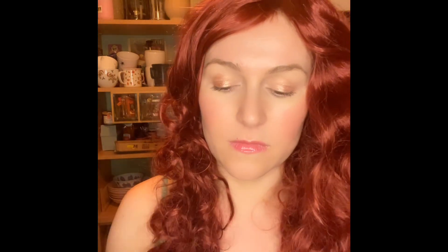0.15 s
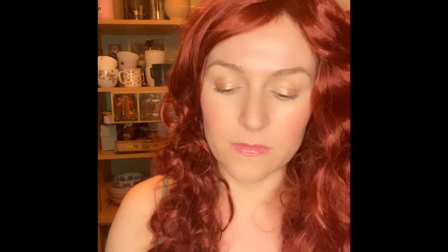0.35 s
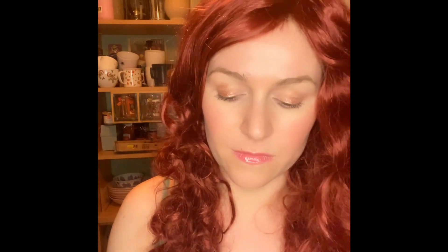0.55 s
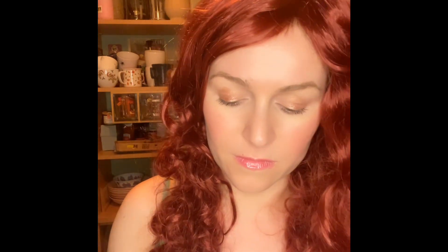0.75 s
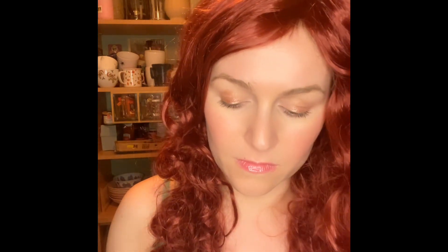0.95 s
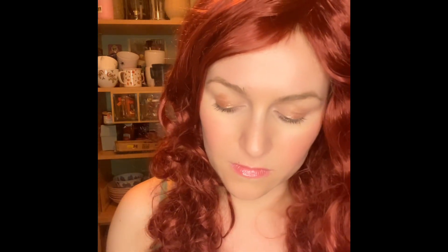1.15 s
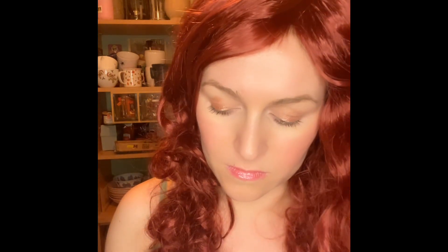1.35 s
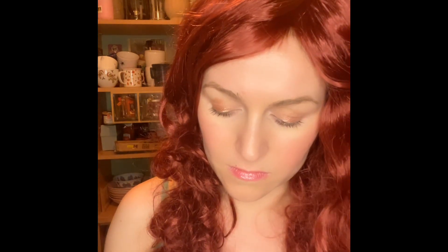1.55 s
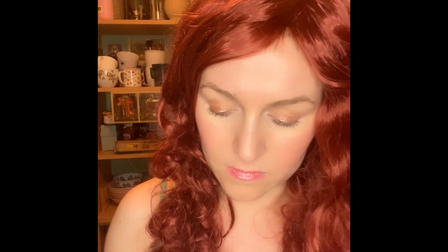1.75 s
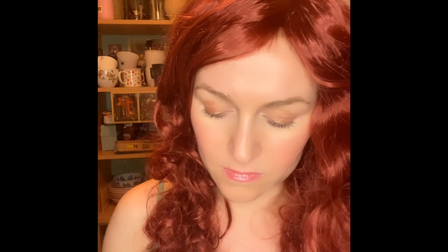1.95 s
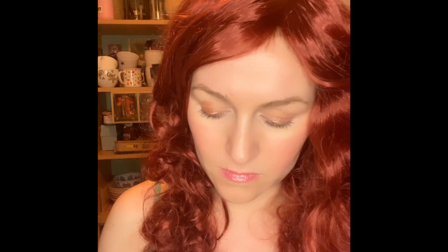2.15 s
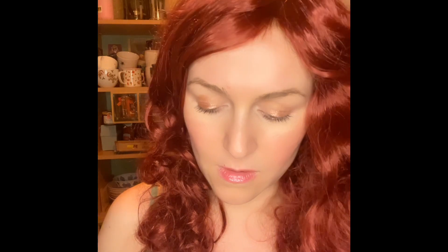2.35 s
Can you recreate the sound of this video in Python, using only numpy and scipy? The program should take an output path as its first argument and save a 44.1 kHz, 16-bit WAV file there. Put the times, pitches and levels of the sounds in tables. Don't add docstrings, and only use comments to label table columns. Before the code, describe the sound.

A zipper on a small cloth bag rasps open in uneven tugs, teeth snapping and ticking, the fabric wall popping softly; close microphone, quiet indoor room with faint reverberation.

```python
import sys
import numpy as np
from scipy import signal
from scipy.fft import rfft, irfft, next_fast_len
from scipy.io import wavfile
from scipy.ndimage import uniform_filter1d, map_coordinates

SR = 44100
rng = np.random.default_rng(int(sys.argv[2]) if len(sys.argv) > 2 else 0)


def invert_db(level):
    return 10 ** (np.asarray(level, dtype=float) / 20)


def persist_wave(psi):
    counts = np.round(np.clip(psi, -1, 1) * 32767).astype(np.int16)
    wavfile.write(sys.argv[1], SR, np.atleast_2d(counts).T)


N = 105840

# frequency in Hz, density in dB per Hz.
TAPE_SPECTRUM = [(120, -7), (200, -7), (426, 3), (522, -7.5), (844, -7.5), (5550, -12), (12500, -25),
                 (15300, -40), (16500, -64)]


def unit(x):
    return x / np.sqrt(np.mean(x ** 2) + 1e-20)


def along(points, hz):
    f, v = np.transpose(points)
    return np.interp(np.log(hz + 1), np.log(f + 1), v)


def wobble(rate):
    knots = rng.standard_normal(1000)
    return map_coordinates(knots, [np.minimum(np.arange(N) * rate / SR, 990)])


def filtered(x, response):
    m = next_fast_len(N + SR // 2)
    return irfft(rfft(x, m) * response(np.fft.rfftfreq(m, 1 / SR)), m)[:N]


def rush(spectrum, patchy_db):
    z = signal.stft(rng.standard_normal(N), nperseg=256)[2]
    field = uniform_filter1d(rng.standard_normal(z.shape), size=6, axis=0)
    field = uniform_filter1d(field, size=4, axis=1)
    x = signal.istft(z * invert_db(patchy_db * unit(field)), nperseg=256)[1][:N]
    return unit(filtered(x, lambda hz: invert_db(along(spectrum, hz))))


def scatter(s, shapes):
    at = np.round(s * SR).astype(int)[:, None] + np.arange(shapes.shape[1])
    return np.bincount(at.ravel(), shapes.ravel(), N + SR)[:N]


def rings(hz, life, t, phase=0):
    return invert_db(-20 * t / life[:, None]) * np.sin(2 * np.pi * hz[:, None] * t + phase)


def air():
    # frequency in Hz, density in dB per Hz.
    air_spectrum = [(12, -30), (20, -1), (566, 5), (7510, -14.5), (8890, -7.5), (14300, -19), (16500, -44)]
    return invert_db(-54.5) * rush(air_spectrum, patchy_db=3.4)


def pull():
    # start in seconds, hold in seconds, pull in dB, weight of the hand on the bag over it in dB.
    tugs = [(0, 0.042, -49, -28), (0.1, 0.04, -45, -1.5), (0.179, 0.04, -38, -20),
            (0.192, 0.036, -37.5, -11), (0.232, 0.13, -26.5, -12), (0.325, 0.068, -22, -10),
            (0.378, 0.063, -30.5, -9), (0.433, 0.16, -36, -7), (0.612, 0.077, -39.5, -5.5),
            (0.719, .04, -47.5, -1), (0.765, 0.018, -45, -6), (0.779, 0.019, -39.5, -3),
            (0.852, 0.032, -32, -4.5), (0.904, 0.021, -34, -11), (1.025, 0.16, -50, 1),
            (1.1003, 0.017, -25.5, -29), (1.117, 0.12, -29.5, -7), (1.286, 0.049, -30.5, -5.5),
            (1.345, 0.051, -40.5, -3), (1.446, 0.26, -35.5, -7.5), (1.549, .018, -30, -1),
            (1.567, 0.034, -25, -4), (1.636, 0.074, -31.5, -4), (1.7095, 0.056, -24.5, -20),
            (1.745, 0.0098, -33.5, -21), (1.796, 0.068, -40, -2.5), (1.856, 0.011, -28.5, -6),
            (1.905, 0.14, -38.5, -4.5), (1.978, 0.053, -28.5, -8), (2.033, 0.039, -33, -7.5),
            (2.115, 0.26, -52, -5), (2.263, 0.1, -46.5, -4)]
    grip_db_per_s, swell_db_per_s, let_go_db_per_s = 25000, 3.5, 337
    start, hold, pull_db, weight_db = np.transpose(tugs)[..., None]
    t = np.arange(N) / SR - start
    shape_db = grip_db_per_s * np.minimum(t, 0)
    shape_db = shape_db + swell_db_per_s * np.clip(t, 0, hold)
    shape_db = shape_db - let_go_db_per_s * np.maximum(t - hold, 0)
    power = invert_db(2 * np.maximum(pull_db + shape_db, -120))
    weight = power * invert_db(2 * weight_db)
    return 10 * np.log10(power.sum(0)), 10 * np.log10(weight.sum(0))


def scrape(pull_db):
    grains_per_s, grain_hz, grain_spread, grain_cycles = 2600, 2350, 0.765, 1.6
    grain_size_db, grain_db, clump_db = 2, -4, 2.5
    rasp_db, flutter_db = -7, 2.4
    count = int(grains_per_s * N / SR)
    when, size = rng.random((2, 8000))[:, :count]
    hz = grain_hz * np.exp(grain_spread * rng.standard_normal(8000)[:count])
    hz = np.clip(hz, 150, 14000)
    t = np.arange(384) / SR
    gain = invert_db(-grain_size_db * np.log(size + 0.0004)) * invert_db(0.5 * along(TAPE_SPECTRUM, hz))
    grains = unit(scatter(when * N / SR, gain[:, None] * rings(hz, grain_cycles / hz, t)))
    clumps = invert_db(clump_db * wobble(90))
    rasp = unit(invert_db(flutter_db * wobble(140)) * rush(TAPE_SPECTRUM, patchy_db=1.5))
    return invert_db(pull_db) * (invert_db(grain_db) * unit(clumps * grains) + invert_db(rasp_db) * rasp)


def bag_resonance(x):
    # centre in Hz, half width in Hz, lift in dB.
    modes = [(430, 156, -5), (850, 104, 4.5), (2500, 600, 3), (6180, 280, 4.5)]
    return filtered(x, lambda f: invert_db(sum(db / (1 + ((f - c) / w) ** 2) for c, w, db in modes)))


def cloth(weight_db):
    # frequency in Hz, density in dB per Hz.
    cloth_spectrum = [(12, -39), (20, 13.5), (134, -1.5), (278, -3.5), (428, 0.5), (700, -4), (910, -75),
                      (1540, -120)]
    lumps_db, lumps_per_s = 1.6, 35
    lumps = invert_db(lumps_db * wobble(lumps_per_s))
    return invert_db(weight_db) * unit(lumps * rush(cloth_spectrum, patchy_db=1.65))


def snaps():
    # time in seconds, peak in dB, ring in Hz.
    tooth_snaps = [(0.0236, -30, 1440), (0.112, -25, 1660), (0.2295, -31, 2420.0), (0.243, -14.5, 4000),
                   (0.2488, -10.5, 4000), (0.2556, -11.5, 4440), (0.292, -12, 5700), (0.3268, -6, 1660),
                   (0.3502, -21, 2160), (0.3547, -6, 3900), (0.3668, -4, 5450), (0.373, -3.5, 4330),
                   (0.3925, -7, 2620), (0.4204, -7, 2740), (0.5022, -17, 1140), (0.5134, -15, 2840),
                   (0.518, -14, 2340), (0.554, -23.5, 3430.0), (0.5857, -25, 5500), (0.6647, -24.5, 930),
                   (0.7843, -22.5, 2060), (0.7887, -23, 3080), (0.85, -10.5, 2700), (0.8704, -15, 2550.0),
                   (0.878, -12, 2700), (0.9064, -12, 1920), (0.9106, -9.5, 3420), (0.921, -17, 3620),
                   (1.0319, -21.5, 910), (1.106, -4, 920), (1.113, 0.5, 6420), (1.121, -31, 2300),
                    (1.1132, -2, 2030), (1.1196, -7, 2360), (1.157, -8, 4030), (1.1747, -8.5, 3340),
                    (1.2283, -17, 2410), (1.2893, -15, 2020), (1.3045, -10.5, 3770), (1.315, -12.5, 2600),
                    (1.3563, -22, 8200), (1.376, -19.5, 870), (1.4485, -44, 2070), (1.4727, -29, 1160),
                    (1.492, -27, 1010), (1.5672, -9.5, 1570), (1.5762, -11, 1170), (1.6028, -21, 1480),
                    (1.603, -7, 1360), (1.664, -14, 5760), (1.6924, -7.5, 3400), (1.703, -14.5, 1170),
                    (1.7197, -5, 3020), (1.738, -6, 1660), (1.751, -18, 1310), (1.7605, -24, 1560),
                    (1.7625, -6.5, 920),
                   (0.105, -31, 1270), (0.1244, -24, 1560), (0.534, -23, 1230), (0.574, -23, 2200),
                  (1.8563, -18, 2500.0), (1.8643, -12, 3080), (1.8828, -18, 930), (1.8948, -15.5, 4840),
                  (1.9514, -20.5, 2420), (1.964, -22, 4000), (1.978, -12.5, 2300), (1.978, -11, 1410),
                  (1.994, -15, 1740.0), (2.0047, -22, 1580), (2.022, -17.5, 2200), (2.038, -18, 910),
                  (2.067, -24, 1700), (2.074, -16.5, 2070), (2.0781, -12, 1020)]
    snap_db, rise_s = -3.5, 0.0002
    ring_cycles, shortest_s, longest_s = 5, 0.002, 0.0035
    crack_db, crack_t60 = 2, 0.0018
    rattle_db, rattle_t60, rattle_width = -12, 0.019, 0.6
    s, db, hz = np.array(tooth_snaps).T
    t = np.arange(2048) / SR
    f = np.fft.rfftfreq(len(t), 1 / SR)
    near_pitch = 1 / (1 + (np.log((f + 1) / hz[:, None]) / rattle_width) ** 2)
    colour = invert_db(along(TAPE_SPECTRUM, f)) * near_pitch
    hiss = irfft(rfft(rng.standard_normal((len(s), len(t)))) * colour)
    hiss = hiss / hiss.std(1, keepdims=True)
    noisy = hiss * (invert_db(crack_db - 60 * t / crack_t60) + invert_db(rattle_db - 60 * t / rattle_t60))
    ring = rings(hz, np.clip(ring_cycles / hz, shortest_s, longest_s), t)
    soft = (1 - np.exp(-t / rise_s)) ** 2
    return scatter(s, invert_db(db + snap_db)[:, None] * soft * (ring + noisy))


def thumps():
    # time in seconds, peak in dB, ring in Hz.
    pops = [(0.281, -14.5, 606), (0.3375, -10, 404), (0.3422, -12, 374), (0.3465, -9.5, 394),
            (0.5415, -15.5, 507), (0.568, -35, 325), (0.576, -20, 430.0), (0.6303, -19, 503),
            (0.9068, -18, 294), (0.9118, -16, 754), (1.1261, -20, 119), (1.2292, -22, 186),
            (1.358, -23, 295), (1.4703, -36, 260), (1.5718, -15, 657), (1.6012, -14, 527),
            (1.7245, -12, 520), (1.7494, -42, 303), (1.8665, -39, 497), (1.9901, -18.5, 320),
            (2.238, -20.5, 760)]
    # time in seconds, peak in dB, ring in Hz.
    heaves = [
        (.187, -28.5, 68.4),
        (1.595, -19, 76.5),
    ]
    cycles, thump_db = 2.4, -2
    s, db, hz = np.transpose(pops + heaves)
    t = np.arange(4096) / SR
    soft = 1 - np.exp(-8 * t * hz[:, None])
    return scatter(s, invert_db(db + thump_db)[:, None] * soft * rings(hz, cycles / hz, t))


def ticks():
    # time in seconds, peak in dB, brightness in Hz.
    dry_teeth = [(.2315, -22, 3500), (.2432, -14, 5000), (.252, -17, 6000), (.2885, -15, 6000),
                 (.2995, -18, 3000), (.3065, -18, 5000), (.343, -22, 12000), (.352, -11, 3000),
                 (.3635, -14, 3000), (.4205, -11, 5500), (.4475, -21, 3000), (.553, -23, 6000),
                 (.659, -30, 4500), (.665, -28, 6000), (1.1055, -16, 9000), (1.228, -17, 5000),
                 (1.289, -16, 5000), (1.4705, -22, 3000), (1.1128, -3, 6500), (1.553, -21, 2500),
                 (1.567, -13, 6000), (1.574, -17, 3000), (1.6025, -14, 6000), (1.624, -21, 2500),
                 (1.633, -19, 6000), (1.646, -21, 5000), (1.66, -22, 5000), (1.675, -20, 3000),
                 (1.68, -21, 3000), (1.698, -19, 3500), (1.704, -15, 6000), (1.7195, -11, 7000),
                 (1.7225, -14, 3000), (1.737, -10, 5500), (1.7615, -15, 8000), (1.8665, -14, 9000),
                 (1.9795, -12, 7000), (1.982, -16, 4000), (1.996, -14, 5000), (2.003, -19, 2500),
                 (2.007, -16, 6000), (2.022, -14, 3500), (2.036, -18, 3000), (2.042, -22, 5000),
                 (2.0645, -21, 3500), (2.075, -21, 4000)]
    tick_db, tick_t60, rise_s = -1.5, 0.0067, 0.00055
    s, db, hz = np.transpose(dry_teeth)
    t = np.arange(1024) / SR
    f = np.fft.rfftfreq(len(t), 1 / SR)
    colour = f / (f + 400) / (1 + (f / hz[:, None]) ** 4)
    hiss = irfft(rfft(rng.standard_normal((len(s), len(t)))) * colour)
    shape = invert_db(db[:, None] + tick_db - 60 * t / tick_t60) * (1 - np.exp(-t / rise_s))
    return scatter(s, shape * hiss / hiss.std(1, keepdims=True))


def fuzz():
    # middle in seconds, half length in seconds, level in dB.
    brushes = [
        (0.298, 0.016, -37),
        (0.369, 0.031, -38.5),
        (1.748, 0.026, -33),
        (2.132, .025, -56),
        (2.344, 0.028, -55.5),
    ]
    corner_hz = 5770
    s, half, db = np.transpose(brushes)[..., None]
    bell = np.exp(-0.5 * ((np.arange(N) / SR - s) / half) ** 2)
    swell = (invert_db(db) * bell).sum(0)
    hiss = rush(TAPE_SPECTRUM, patchy_db=0.91)
    return swell * unit(filtered(hiss, lambda f: 1 / (1 + (corner_hz / (f + 1)) ** 6)))


def jerks():
    # time in seconds, peak in dB, width in seconds.
    pushes = [(.2905, -12, .0002), (.3422, -7, .0006), (.3449, -9, .0004), (.3518, -9, .0003),
              (.568, -23, .0007), (1.229, -15, .0008), (1.4705, -16, .0003), (1.6022, -10, .0003),
              (1.6043, -11, .0003), (1.7507, -12, .0003), (1.8666, -9, .0002), (1.9808, -12, .0002),
              (1.9905, -19, .0003), (1.1275, -15, .0002), (2.2378, -26, .0002), (1.996, -12, .0002)]
    rebound = 3
    s, db, width = np.transpose(pushes)
    u = np.arange(1024) / SR / width[:, None]
    push = u * np.exp(1 - u) - u / rebound ** 2 * np.exp(1 - u / rebound)
    return scatter(s - width, invert_db(db)[:, None] * push)


def tab():
    # time in seconds, peak in dB, pitch in Hz, decay time t60 in seconds.
    chimes = [
        (1.5775, -20, 6350, .04),
        (1.3625, -35, 6400, .04),
    ]
    s, db, hz, t60 = np.transpose(chimes)
    t = np.arange(2048) / SR
    soft = 1 - np.exp(-t / 0.00062)
    return scatter(s, invert_db(db)[:, None] * soft * rings(hz, t60 / 3, t))


def room(x):
    # frequency in Hz, decay time t60 in seconds.
    decay = [(200, 0.11), (2000, 0.32), (10000, 0.36)]
    hz, t, z = signal.stft(rng.standard_normal(SR // 2), SR, nperseg=256)
    tail = signal.istft(z * invert_db(-60 * t / along(decay, hz)[:, None]), SR, nperseg=256)[1]
    late = np.pad(x, (150, 0))
    return signal.fftconvolve(late, tail / np.linalg.norm(tail))[:N]


def scene():
    pull_db, weight_db = pull()
    bag = bag_resonance(scrape(pull_db)) + cloth(weight_db)
    bag = bag + snaps() + thumps() + ticks() + fuzz() + jerks() + tab()
    return (bag + invert_db(-11.5) * room(bag) + air())[None]


def roll_off(x):
    return signal.sosfilt(signal.butter(12, 16650, fs=SR, output="sos"), x)


def record(dry):
    bass_hz, top_hz = 28, 16300
    mix = filtered(dry[0], lambda hz: (hz < top_hz) * hz ** 2 / (hz ** 2 + bass_hz ** 2))
    return roll_off(mix[None])


dry = scene()
out = record(dry)
persist_wave(out)
```